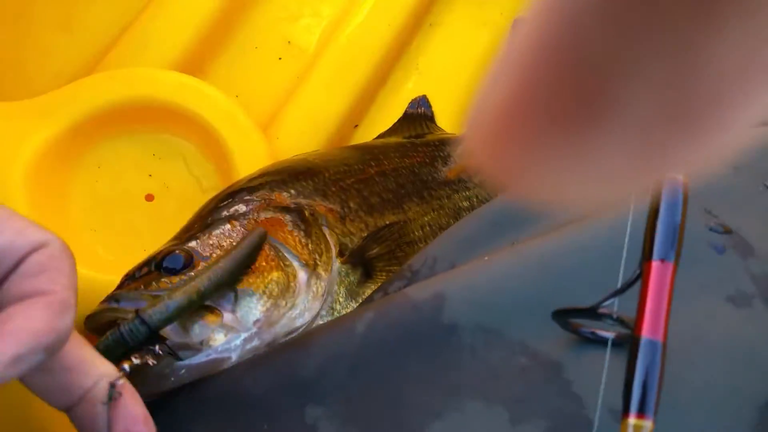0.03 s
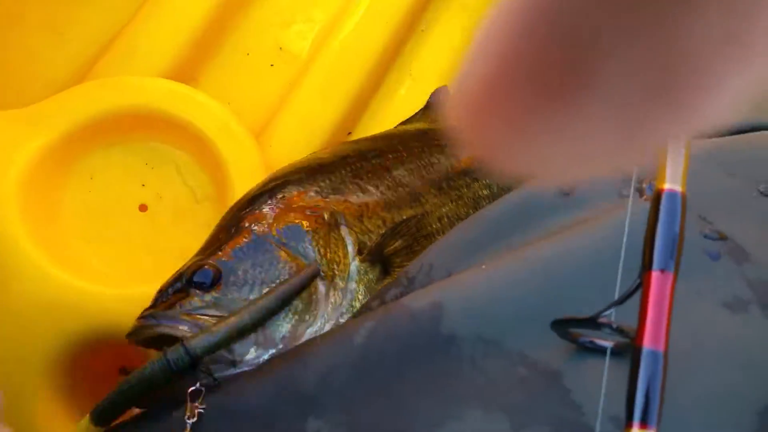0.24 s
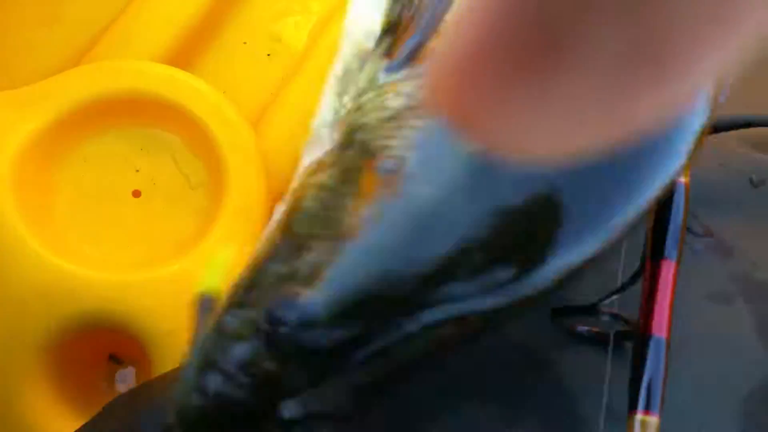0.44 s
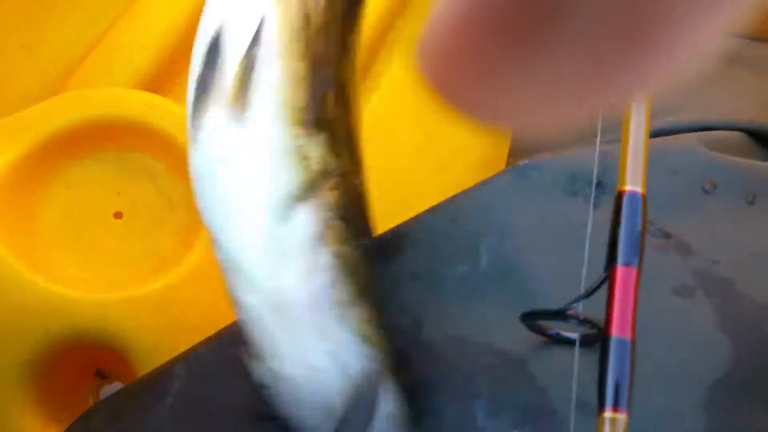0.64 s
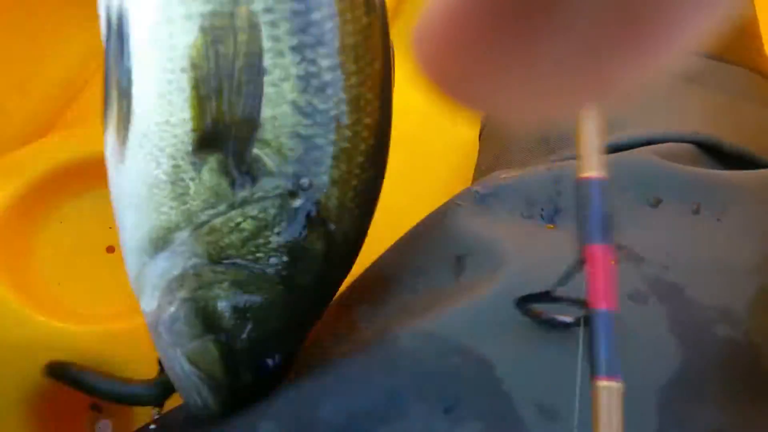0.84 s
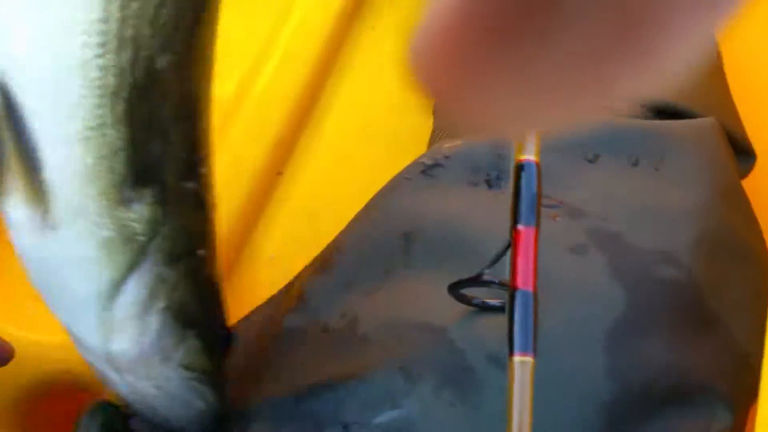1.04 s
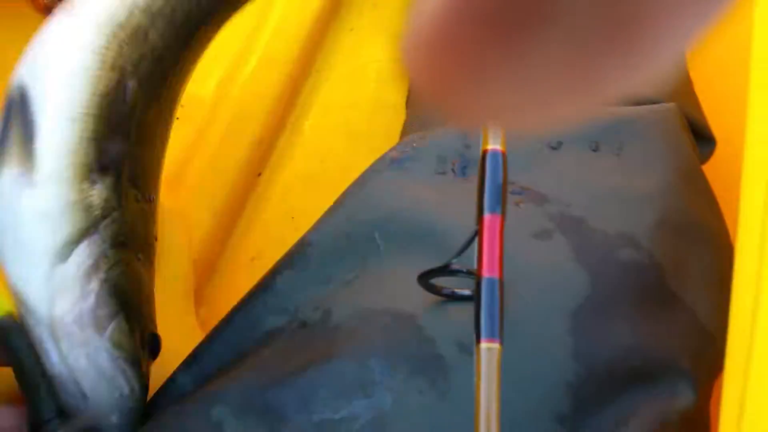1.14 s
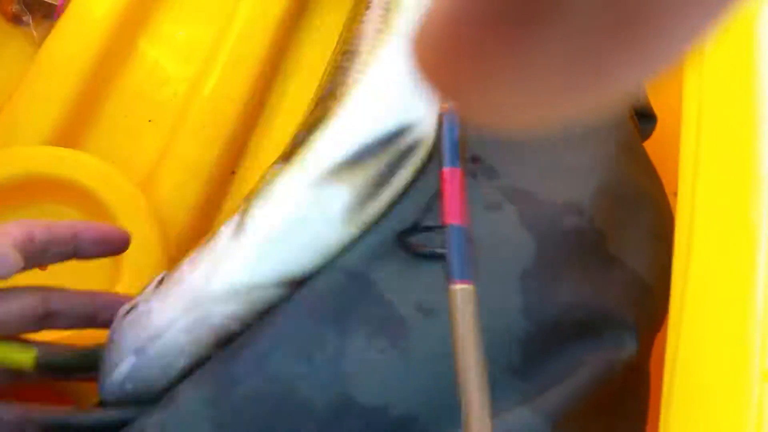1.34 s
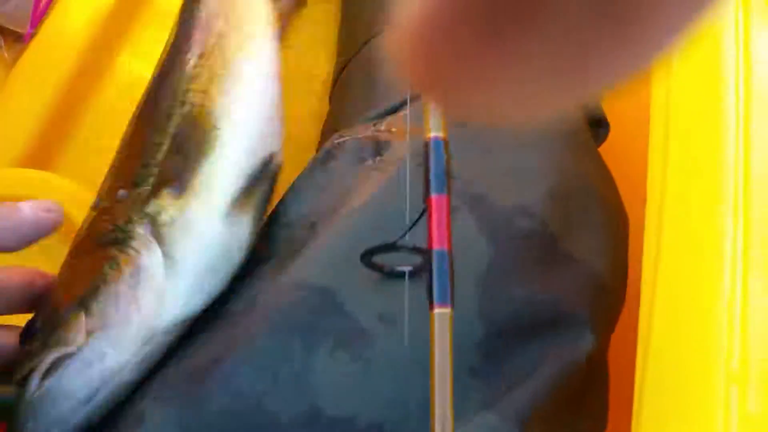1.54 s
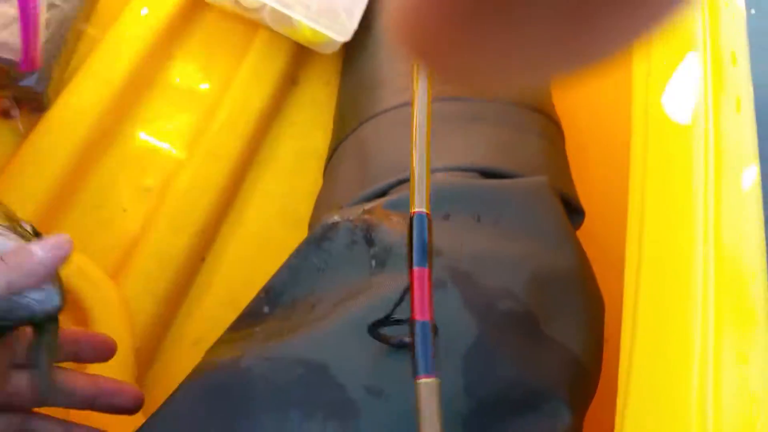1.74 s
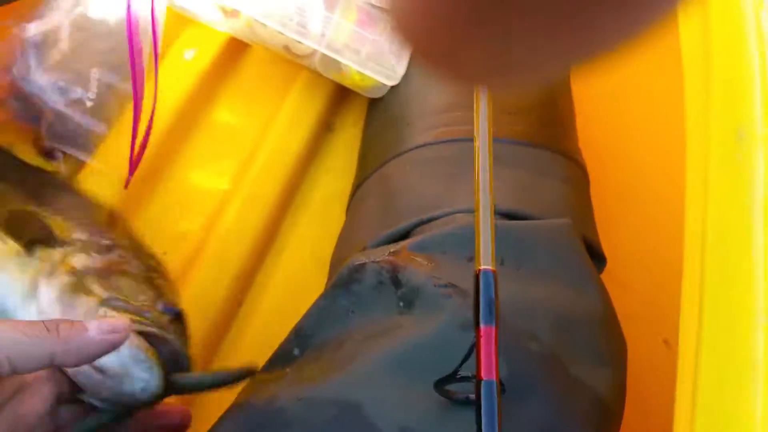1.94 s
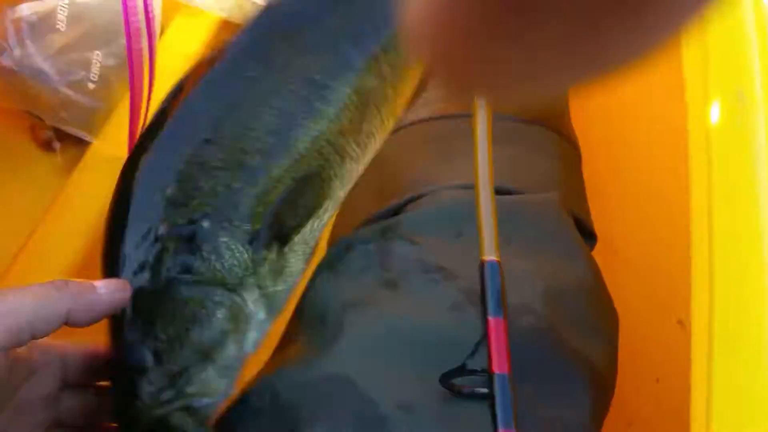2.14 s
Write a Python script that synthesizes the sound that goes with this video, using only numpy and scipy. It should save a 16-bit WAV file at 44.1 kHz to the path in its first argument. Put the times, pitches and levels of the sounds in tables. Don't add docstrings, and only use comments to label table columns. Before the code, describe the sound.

A wet fish thrashes on a hollow plastic kayak deck, heard close in stereo. Near quiet until 0.4 s, then sliding, bony knocks and dull tail flicks. Hard, spattering slaps with deep hull booms cluster at 0.8-1.0 s. After a lull with faint touches, slaps return at 1.3-1.5 s, strike sharply at 1.7-1.9 s, and again near 2.07 s. Small skin squeaks, faint air and lapping water lie underneath.

```python
import sys
import numpy as np
from scipy import signal
from scipy.io import wavfile

SR = 44100
rng = np.random.default_rng(int(sys.argv[2]) if len(sys.argv) > 2 else 0)


def output_pcm(signal):
    pcm = np.clip(np.atleast_2d(signal).T, -1, 1) * 32767
    wavfile.write(sys.argv[1], SR, np.round(pcm).astype(np.int16))


def undo_db(level):
    steps = np.asarray(level, float) / 20
    return 10 ** steps


N = 96402
T = np.arange(N) / SR

# frequency in Hz, density in dB per Hz.
AIR_SPECTRUM = [(25, -4.5), (100, 6), (285, -7.5), (1000, -13), (1500, -18.5), (3000, -28.5), (6800, -35.5),
                (16000, -32)]
# start in seconds, level in dB, upper mode in Hz, hold in seconds,
# deep mode in dB relative to the upper.
HULL_BOOMS = [(0.398, -27, 135, 0.038, 7), (0.439, -29, 196, 0.044, 4), (0.477, -30.5, 145, 0.013, 14.5),
              (0.571, -17.5, 233, 0.014, -1.5), (.600, -16.5, 169.7, 0.01, -9),
              (0.662, -18.5, 238, 0.013, -13), (0.692, -24, 130, 0.046, -2.5), (.755, -18, 220, 0.009, -4),
              (.803, -14.5, 196, 0.019, -8), (0.839, -7, 138.3, 0.033, -5), (.906, -6.5, 165, 0.024, -8),
              (0.948, -17, 142, .01, -3), (1.000, -12.5, 158, 0.012, -2.5),
              (1.045, -46.5, 127, 0.011, 25.5), (1.285, -16, 215, 0.0018, -3),
              (1.295, -19, 121, 0.018, -13), (1.354, -19.5, 195, 0.012, 7), (1.364, -20.5, 148, 0.011, 5),
              (1.404, -13.5, 170.5, 0.033, -24), (1.48, -13, 127, 0.0081, -21),
              (1.505, -15.5, 187.6, 0.022, -6.5), (1.605, -24, 150, 0.021, -48),
              (1.738, -9.5, 195, 0.026, 0), (1.765, -16, 123, .012, -18), (1.796, -4, 165, 0.0135, -5),
              (1.831, -12.5, 146, 0.014, -28), (2.068, -19, 203, 0.02, -12),
              (2.086, -8.5, 187.7, 0.027, -5), (2.128, -12.5, 166, 0.011, -19.5)]
# frequency in Hz, width in Hz, level in dB.
HULL_MODES = [(62.4, 87, -4), (90.7, 41.2, 5), (165, 40.5, 4), (258, 51, -1), (365, 66, -5),
              (567, 110, -27)]
# start in seconds, length in seconds, level in dB,
# hiss above 2.5 kHz in dB relative to the level.
BODY_SLIDES = [
    (-.06, 0.078, -30, -17),
    (0.383, 0.18, -27, -1),
    (0.82, 0.076, -25, -1.5),
    (1.12, 0.13, -60.5, 15.5),
    (1.297, 0.17, -27, -1.5),
    (1.698, 0.088, -30, -1),
    (1.828, 0.064, -50.5, 19.5),
    (1.964, 0.077, -38.5, 14.5),
    (2.022, .13, -34.5, 10.5),
]
# start in seconds, peak in dB.
LIGHT_TOUCHES = [(0.391, -34), (0.414, -37), (0.5996, -25), (1.105, -30), (1.156, -28), (1.2229, -31),
                 (1.2847, -23.5), (1.679, -17.5), (1.938, -23), (1.982, -28.5), (2.0104, -23)]
# frequency in Hz, density in dB per Hz.
SLIDE_SPECTRUM = [(250, 5.5), (400, -0.5), (840, -4.5), (1200, -8), (2000, -7), (6300, -21.5),
                  (9000, -23.5), (16000, -20)]
# start in seconds, length in seconds, level in dB,
# resonance in Hz, width in Hz.
SKIN_SQUEAKS = [(-.05, 0.12, -38.5, 2000, 300), (-.05, 0.19, -45, 2960, 880), (0.26, 0.32, -44.5, 850, 390),
                (0.407, 0.085, -37.5, 6200, 400), (0.424, .09, -35.5, 2170, 600),
                (0.807, .018, -17, 815, 250), (1.171, 0.094, -46.5, 2380, 500),
                (1.36, 0.024, -31, 1770, 200), (1.394, 0.014, -28, 2100, 200),
                (1.451, 0.028, -26, 1840, 200), (1.508, 0.028, -28.5, 2040, 120),
                (1.731, 0.017, -20.5, 1110, 450), (1.743, .018, -22, 930, 500),
                (1.795, 0.041, -26, 2470, 200)]
# start in seconds, peak in dB, mode in Hz, ring in cycles.
BONY_KNOCKS = [(.391, -26, 767, 7), (0.406, -24, 500, 5.9), (.43, -16.5, 700, 6.6),
               (0.447, -16.5, 940, 7.7), (.463, -17, 810, 8.8), (0.522, -13, 480, 5.2),
               (0.566, -21.5, 380, 42), (0.663, -16.5, 404, 9.5), (0.754, -19, 392, 11),
               (.802, -14.5, 862, 44), (.838, -15, 523, 16), (0.886, -6, 810, 5), (1.002, -15.5, 704, 25.5),
               (1.106, -53, 450, 6), (1.159, -34, 587, 21), (1.188, -25, 1210, 12.4), (1.895, -25, 860, 13),
               (1.26, -28, 635, 9), (1.286, -7.5, 414, 3.4), (1.331, -24, 557, 7), (1.355, -17, 470, 12),
               (1.384, -29, 925, 6.8), (1.4393, -11.5, 870, 8.6), (1.68, -22, 510, 11),
               (1.706, -20, 1150, 12), (1.72, -16, 554, 5.6), (1.733, -6.5, 904, 11),
               (1.751, -13.5, 696, 5.2), (1.792, -15.5, 460, 12), (2.01, -26, 510, 8),
               (2.055, -24.5, 413, 28), (2.068, -28, 406, 9), (2.081, -16, 406, 14.6)]
# start in seconds, peak in dB.
TAIL_FLICKS = [
    (0.5645, -12.5),
    (0.66, -14),
    (0.752, -16.5),
    (0.983, -16),
    (1.6018, -25),
]
# frequency in Hz, density in dB per Hz.
FLICK_SPECTRUM = [(900, -11.5), (1500, -20), (2000, -3), (2700, -4), (4200, -11.5), (6100, -15.5),
                  (9000, -30), (16000, -28)]
# start in seconds, peak in dB, spray above 7.5 kHz in dB relative to the peak, ring in
# Hz, contact in seconds.
FLANK_SLAPS = [(.801, 0, -18.5, 1740, 0.0018), (0.81, -22, -20, 1580, .002),
               (0.8329, -9, -21.5, 2560, 0.0056), (0.8777, -14, -20, 2000, 0.0032),
               (0.8844, 0.5, -23, 1980, 0.0016), (0.8968, 0, -36, 2690, 0.002),
               (0.898, -13.5, -23, 1500, 0.003), (0.92, -7.5, -19.5, 5330, .004),
               (1.006, -15.5, -26.5, 1680, 0.0024), (1.3303, -13, -13, 2520, 0.0042),
               (1.3495, -4.5, -25.5, 2050, 0.0053), (1.3945, -7, -29, 1620, 0.0058),
               (1.4035, -6, -22.5, 2640, 0.0032), (1.4338, -17, -33, 2570, 0.0023),
               (1.4554, -15.5, -39, 2780, 0.0033), (1.492, -7, -21, 1920, 0.003),
               (1.4997, -10.5, -22, 4400, 0.0014), (1.7172, -21.5, -13, 5050, 0.0046),
               (1.7303, -1.5, -22, 3550, .005), (1.7827, -0.5, -23, 1694, 0.01),
               (1.848, -19, -17, 2320, 0.0011), (1.872, -17.5, -29, 2550, 0.0023),
               (1.8889, -16.5, -18, 2720, .001), (1.8962, -16, -23, 2510, .002),
               (2.0525, -18, -16, 1760, 0.0063), (2.065, -3.5, -17.5, 3600, 0.0025),
               (2.075, -23, -34, 1610, 0.0026), (2.088, -10.5, -37, 2730, .008),
               (2.1034, -17.5, -26, 4900, 0.0028), (2.1297, -13, -21, 2830, 0.0066)]
# frequency in Hz, density in dB per Hz.
SLAP_SPECTRUM = [(600, -7), (1300, -7.5), (1700, -5.5), (2600, 0), (3500, -5), (6300, -8.5), (8500, -7),
                 (16000, -4)]
# frequency in Hz, left minus right in dB.
PORT_BALANCE = [(60, 1.5), (130, 2), (290, 0), (640, 7), (1410, -4), (3100, -3), (6820, 12.5), (15000, 0.5)]
# frequency in Hz, left-right correlation.
PORT_LIKENESS = [(60, 1), (180, 0.95), (550, 0.71), (1650, 0.021), (4970, -0.79), (15000, 0.33)]

AIR_DB = -40
BOOM_ATTACK_S, BOOM_T60_S, BOOM_SAG_PER_S, DEEP_RATIO = 0.00128, 0.039, 2.52, 0.578
RUMBLE_DB, RUMBLE_SIDE_DB, RUMBLE_T60_S = -16, -16.0, 0.25
TOUCH_DB, TOUCH_T60_S = -7.5, 0.12
SQUEAK_DB, SQUEAK_RISE = 0.5, 0.22
KNOCK_DB, KNOCK_PARTNER_DB, KNOCK_PARTNER_RATIO = 0.5, -3.5, 0.555
FLICK_DB, FLICK_T60_S = -7, 0.079
FLICK_RING_HZ, FLICK_WIDTH_HZ, FLICK_RING_DB = 2630, 80, 10.5
SLAP_DB, SLAP_T60_S, SLAP_ATTACK_S, SPRAY_MEAN_DB = -14, 0.075, 0.00072, -16.5
SLAP_WIDTH_HZ, SLAP_RING_DB = 140, 8
ATTACK_S, CRACK_DB, CRACK_T60_S, TAIL_DB, TAIL_T60_S = 0.00049, 1.5, 0.018, -41, 0.7
LOW_EXTRA, SPRAY_LASTS = 0.027, 0.9
RING_T60_S, STRIKE, RAGGED_DB = 0.06, 20.5, 3
DROPS_PER_S, DROP_SPREAD_DB, BLOW_SMOOTH = 4000, 2.5, 0.55
MIC_STEP_HZ, MIC_STEP_DB, MIC_LOW_HZ = 7300, -7, 41
MIC_TOP_HZ, MIC_TOP_WIDTH_HZ, MIC_TOP_DB = 15550, 500, -6
CUTOFF_HZ, SOFT_PEAK = 15800, 0.88


def at_hz(points, hz):
    table = np.array(points)
    return np.interp(np.log(hz), np.log(np.maximum(table[:, 0], 1)), table[:, 1])


def port_gains(hz):
    lean_db = at_hz(PORT_BALANCE, hz) / 2
    return undo_db(np.array([[lean_db], [-lean_db]]))


def rms_one(x):
    return x / np.sqrt(np.mean(x ** 2) + 1e-20)


def drift(rate_hz):
    knots = rng.standard_normal(int(N / SR * 200) + 9)
    return np.interp(T * rate_hz * 2, np.arange(len(knots)), knots)


def hit(start_s, t60_s, hold_s=0., attack_s=ATTACK_S):
    out = np.zeros(N)
    t60_s = max(t60_s, 0.005)
    span = slice(int(start_s * SR) + 1, int((start_s + hold_s + 1.5 * t60_s) * SR))
    t = T[span] - start_s
    release = undo_db(-60 * np.maximum(t - hold_s, 0) / t60_s)
    out[span] = (1 - np.exp(-t / attack_s)) * release
    return out


def resonate(x, peaks):
    out = 0
    for k, (hz, width_hz, db) in enumerate(peaks):
        r = np.exp(-np.pi * width_hz / SR)
        poles = [1, -2 * r * np.cos(2 * np.pi * hz / SR), r * r]
        out = out + (-1) ** k * undo_db(db) * signal.lfilter([1 - r * r, 0, r * r - 1], poles, x)
    return out


def spatter(smooth):
    sizes = undo_db(DROP_SPREAD_DB * np.minimum(rng.exponential(1, N), 4))
    drops = sizes * (rng.random(N) < DROPS_PER_S / SR)
    return rng.standard_normal((2, 2, N)) * (smooth + rms_one(drops) * (1 - smooth))


def bank(white, envelope, spectrum):
    edges = 29.3 * 2 ** np.arange(0, 9.6, 0.5)
    hz = np.sqrt(edges[1:] * edges[:-1])
    gains = undo_db(at_hz(spectrum, hz))
    power = np.sum(gains ** 2 * np.diff(edges) * (hz < CUTOFF_HZ)) * 2 / SR
    audible = (gains > gains.max() / 300) * (hz >= spectrum[0][0])
    gains = gains * audible / np.sqrt(power)
    out = np.zeros((2, N))
    for k in np.flatnonzero(gains):
        band = signal.butter(2, edges[k:k + 2], "band", fs=SR, output="sos")
        mid, side = signal.sosfilt(band, white[k % 2] * envelope(hz[k]) + 1e-18)
        alike = np.clip(at_hz(PORT_LIKENESS, hz[k]), 0, 1)
        stereo = np.sqrt(1 + alike) * mid + np.sqrt(1 - alike) * side * [[1], [-1]]
        out += gains[k] * port_gains(hz[k]) * stereo
    return out


def lake():
    shared = drift(5.22)
    white = rng.standard_normal((2, 2, N))
    return undo_db(AIR_DB) * bank(white, lambda hz: undo_db(1.2 * shared + 1.8 * drift(14)), AIR_SPECTRUM)


def hull():
    boom, shake = 0, 0
    turns = rng.random((len(HULL_BOOMS), 2))[:, 0]
    for (s, db, hz, hold_s, deep_db), turn in zip(HULL_BOOMS, turns):
        t = np.maximum(T - s, 0)
        cycles = hz * (1 - np.exp(-BOOM_SAG_PER_S * t)) / BOOM_SAG_PER_S
        deep = undo_db(deep_db) * np.sin(2 * np.pi * (DEEP_RATIO * cycles + turn))
        wave = np.sin(2 * np.pi * cycles) + deep
        boom = boom + undo_db(db) * 0.73 * hit(s, BOOM_T60_S, hold_s, BOOM_ATTACK_S) * wave
        shake = shake + undo_db(db + RUMBLE_DB) * hit(s, RUMBLE_T60_S, hold_s, BOOM_ATTACK_S)
    mid, side = rng.standard_normal((2, N))
    scale = np.std(resonate(mid, HULL_MODES))
    centre = boom + resonate(mid * shake, HULL_MODES) / scale
    spread = undo_db(RUMBLE_SIDE_DB) * resonate(side * shake, HULL_MODES) / scale
    return centre * undo_db(np.array([[0.9], [-0.9]])) + spread * [[1], [-1]]


def slides():
    swell, hiss = 0, 0
    for s, length_s, db, hiss_db in BODY_SLIDES:
        shape = np.sin(np.pi * np.clip((T - s) / length_s, 0, 1)) ** 1.24
        swell = swell + undo_db(db) * shape
        hiss = hiss + undo_db(db + hiss_db) * shape
    touch = sum(undo_db(db + TOUCH_DB) * hit(s, TOUCH_T60_S) for s, db in LIGHT_TOUCHES)
    shared = drift(60)

    def friction(hz):
        stutter = undo_db(2.5 * shared + 2.5 * drift(45))
        return (hiss if hz > 2500 else swell) * stutter + touch

    return bank(spatter(0.45), friction, SLIDE_SPECTRUM)


def squeaks():
    out, grains = np.zeros((2, N)), spatter(0.67)[0]
    for s, length_s, db, hz, width_hz in SKIN_SQUEAKS:
        span = slice(max(int(s * SR), 0), int((s + length_s) * SR))
        part = (T[span] - s) / length_s
        shape = np.clip(np.minimum(part / SQUEAK_RISE, 1 - part), 0, 1)
        tone = rms_one(resonate(grains[:, span], [(hz, width_hz, 0)]))
        out[:, span] += undo_db(db + SQUEAK_DB) * shape * tone * port_gains(hz)
    return out


def knocks():
    out = 0
    for s, db, hz, cycles in BONY_KNOCKS:
        phase = 2 * np.pi * hz * (T - s)
        modes = np.sin(phase) + undo_db(KNOCK_PARTNER_DB) * np.sin(KNOCK_PARTNER_RATIO * phase)
        out = out + undo_db(db + KNOCK_DB) * hit(s, cycles / hz) * modes
    return out * undo_db(2.5 * drift(95)) * undo_db(np.array([[1.7], [-1.7]]))


def blows(rows, spectrum, t60_s, ring_db, width_hz, attack_s):
    low, top = 0, 0
    for s, db, spray_db, _, contact_s in rows:
        crack = hit(s, CRACK_T60_S, 0, attack_s)
        body = hit(s, t60_s * (1 + LOW_EXTRA), contact_s, attack_s)
        spray = hit(s, t60_s * SPRAY_LASTS, contact_s, attack_s)
        low = low + undo_db(db) * (undo_db(CRACK_DB) * crack + body + undo_db(TAIL_DB) * hit(s, TAIL_T60_S))
        top = top + undo_db(db + spray_db) * (undo_db(2 * CRACK_DB) * crack + spray)

    def ragged(hz):
        return (top if hz > 7500 else low) * undo_db(RAGGED_DB * drift(90))

    out = bank(spatter(BLOW_SMOOTH), ragged, spectrum)
    drops = spatter(BLOW_SMOOTH)[0]
    for s, db, _, hz, contact_s in rows:
        span = slice(int(s * SR), int(s * SR) + SR // 5)
        push = drops[:, span] * hit(s, RING_T60_S, contact_s, attack_s)[span]
        push[:, [20, 24]] += STRIKE * SLAP_WIDTH_HZ / width_hz * np.eye(2)
        out[:, span] += resonate(push, [(hz, width_hz, db + ring_db)]) * port_gains(hz)
    return out


def flicks():
    rows = [(s, db + FLICK_DB, 0, FLICK_RING_HZ, 0) for s, db in TAIL_FLICKS]
    return blows(rows, FLICK_SPECTRUM, FLICK_T60_S, FLICK_RING_DB, FLICK_WIDTH_HZ, ATTACK_S)


def slaps():
    rows = [(s, db + SLAP_DB, spray_db - SPRAY_MEAN_DB, hz, contact_s)
            for s, db, spray_db, hz, contact_s in FLANK_SLAPS]
    return blows(rows, SLAP_SPECTRUM, SLAP_T60_S, SLAP_RING_DB, SLAP_WIDTH_HZ, SLAP_ATTACK_S)


def scene():
    return flicks() + slaps() + knocks() + slides() + hull() + lake() + squeaks()


def top_cut(x):
    return signal.sosfilt(signal.butter(12, 16990, fs=SR, output="sos"), x)


def record(dry):
    low = signal.sosfilt(signal.butter(9, MIC_STEP_HZ, "low", fs=SR, output="sos"), dry)
    high = signal.sosfilt(signal.butter(9, MIC_STEP_HZ, "high", fs=SR, output="sos"), dry)
    peak = resonate(high, [(MIC_TOP_HZ, MIC_TOP_WIDTH_HZ, MIC_TOP_DB)])
    x = low + undo_db(MIC_STEP_DB) * (high + peak)
    x = signal.sosfilt(signal.butter(2, MIC_LOW_HZ, "high", fs=SR, output="sos"), x)
    x = SOFT_PEAK * np.tanh(x / SOFT_PEAK)
    mix = signal.sosfilt(signal.cheby1(12, 1, CUTOFF_HZ, fs=SR, output="sos"), x)
    return top_cut(mix)


dry = scene()
out = record(dry)
output_pcm(out)
```